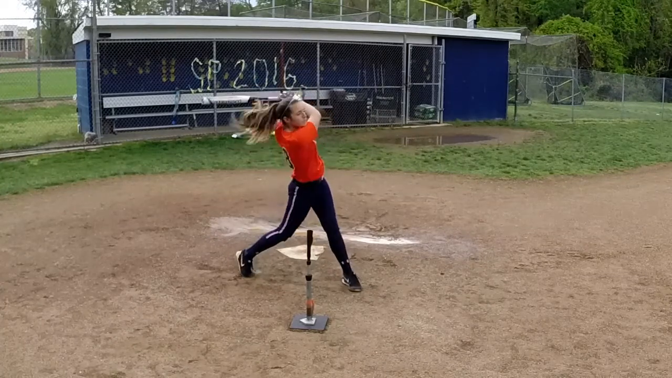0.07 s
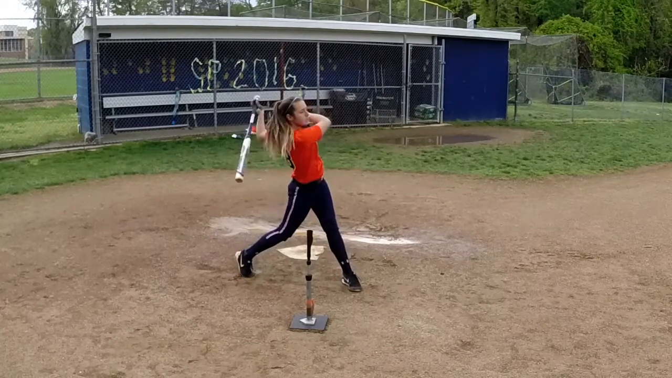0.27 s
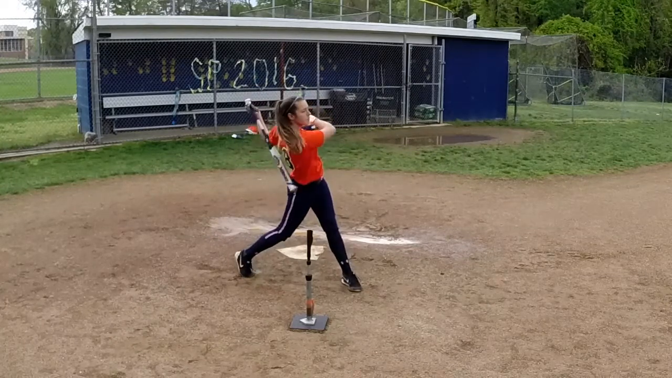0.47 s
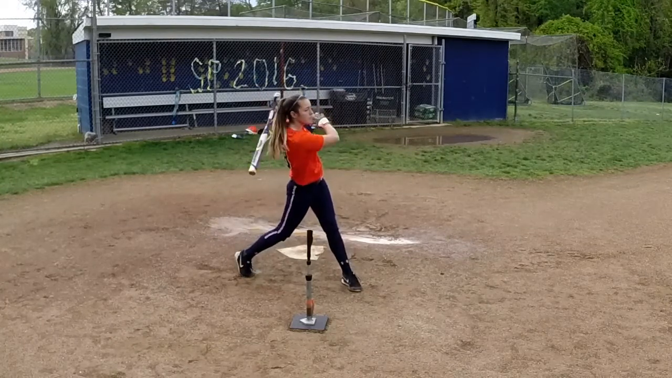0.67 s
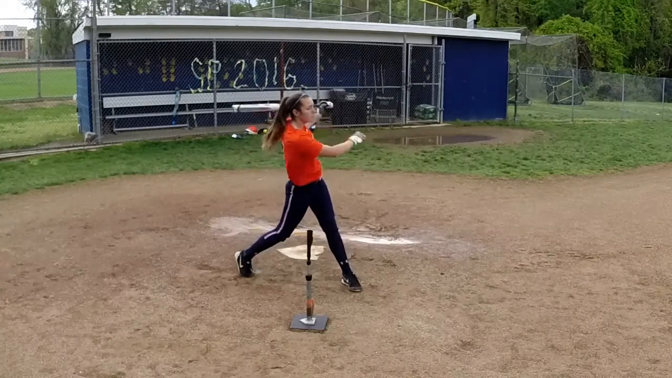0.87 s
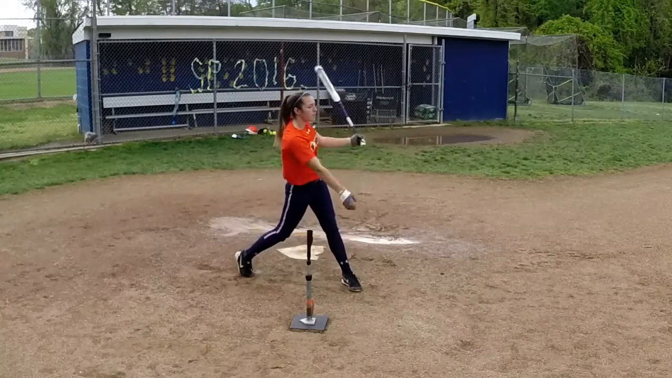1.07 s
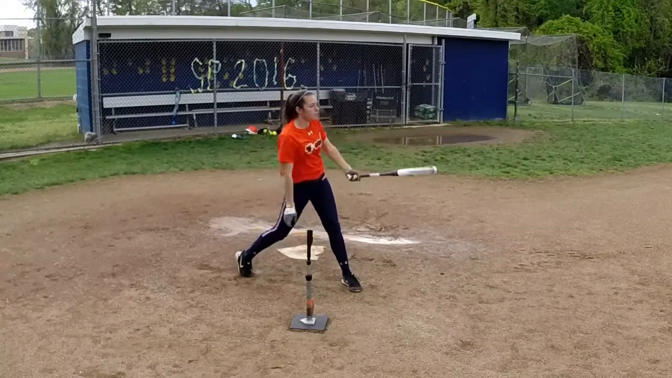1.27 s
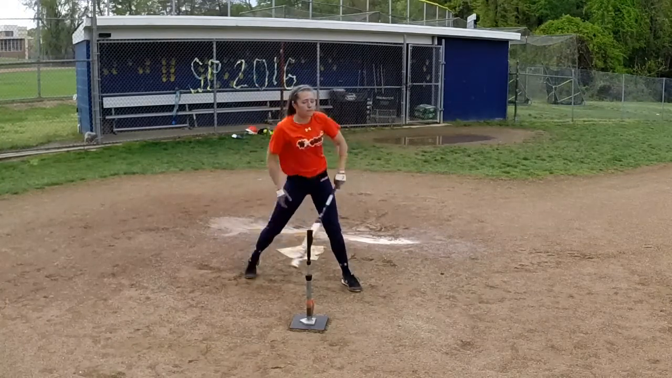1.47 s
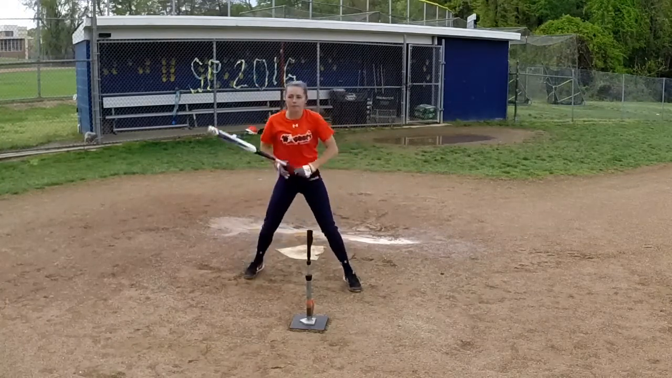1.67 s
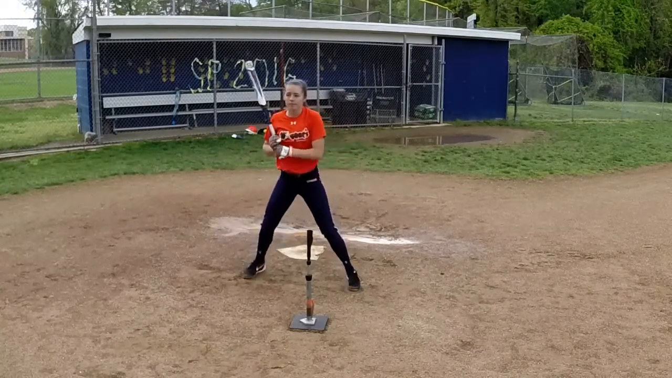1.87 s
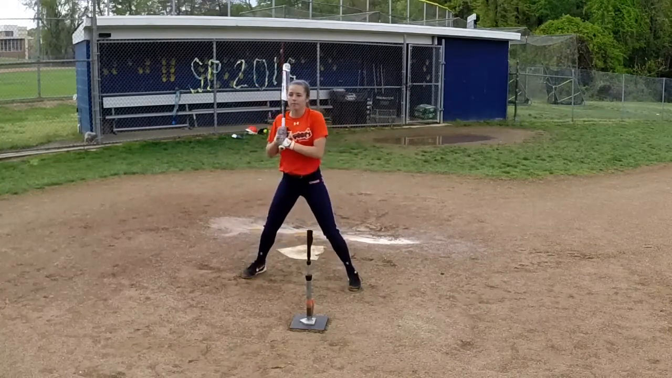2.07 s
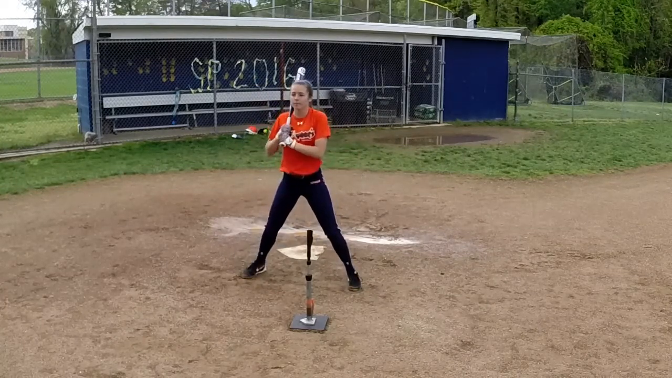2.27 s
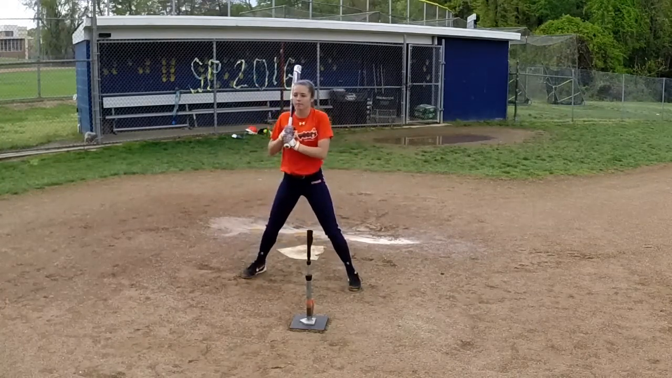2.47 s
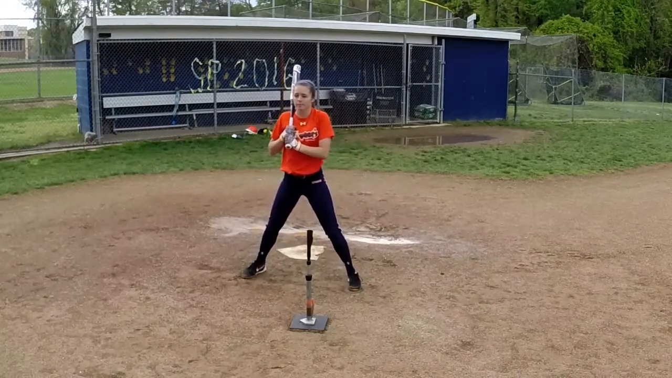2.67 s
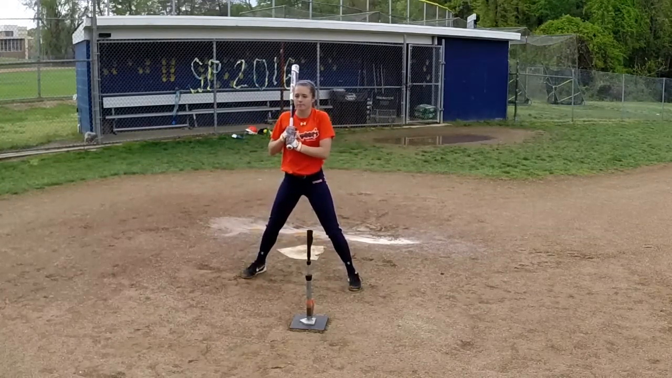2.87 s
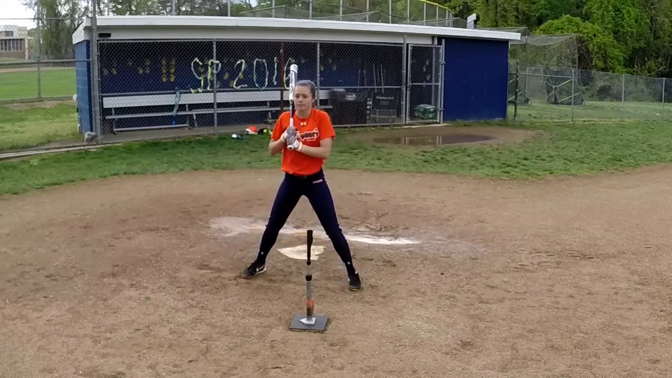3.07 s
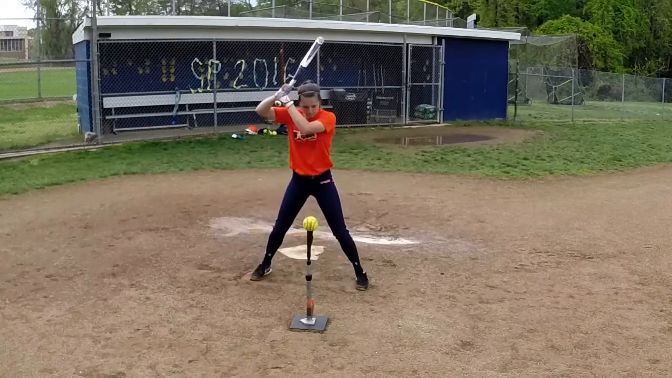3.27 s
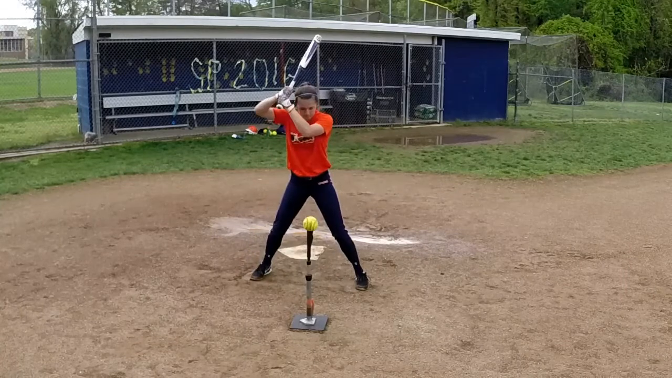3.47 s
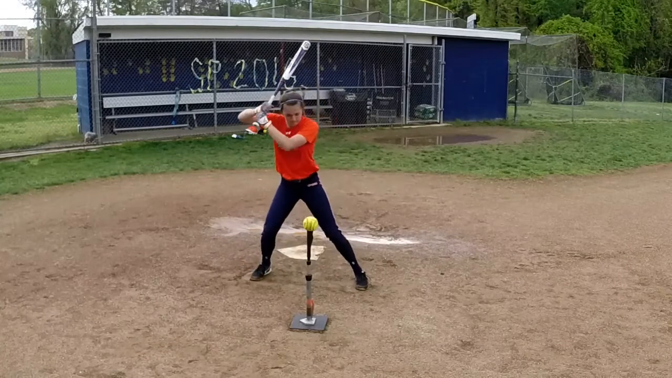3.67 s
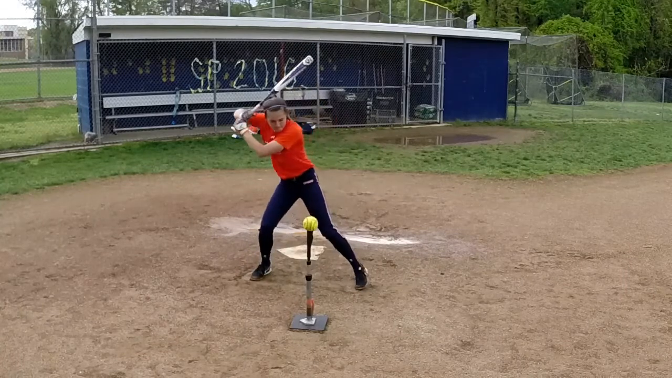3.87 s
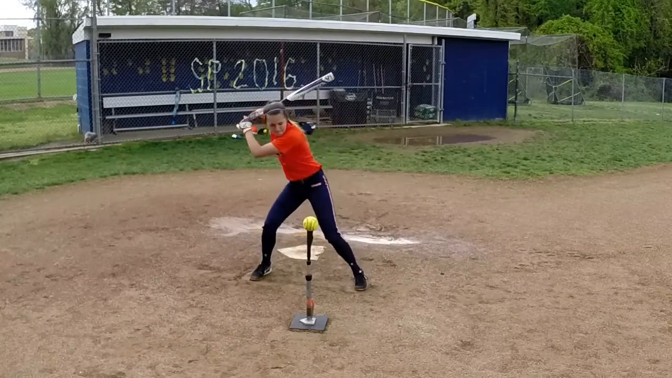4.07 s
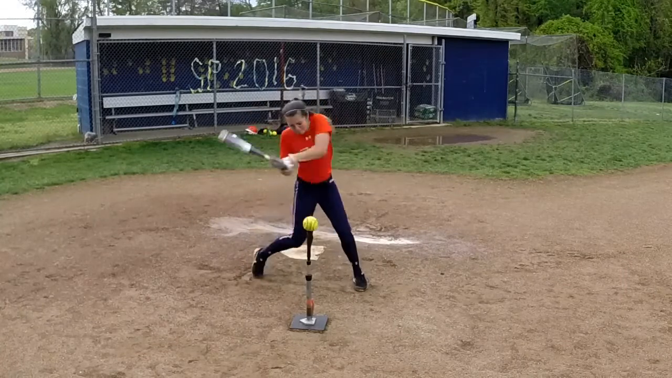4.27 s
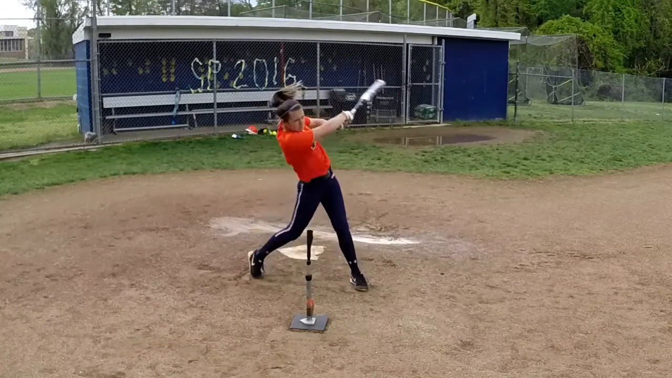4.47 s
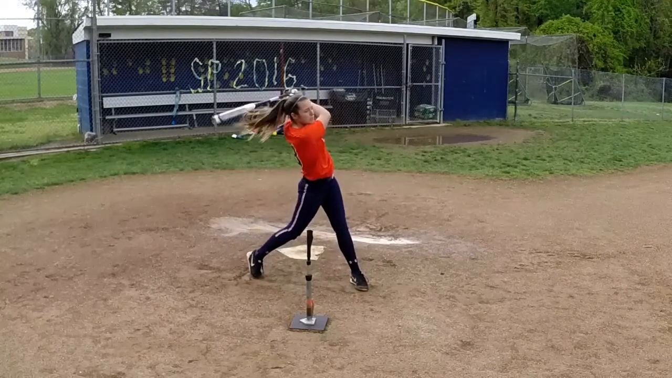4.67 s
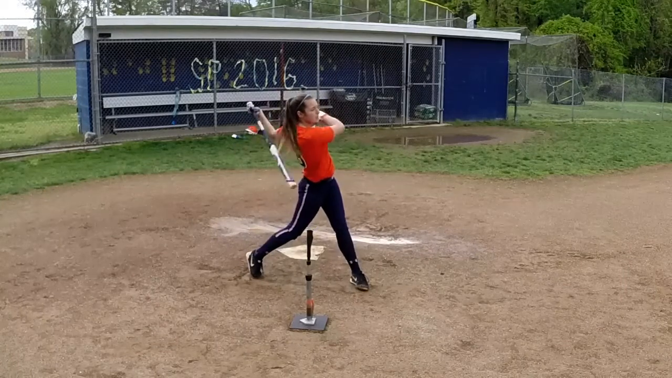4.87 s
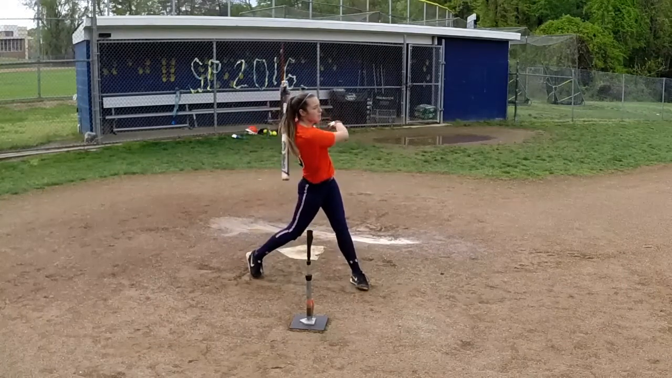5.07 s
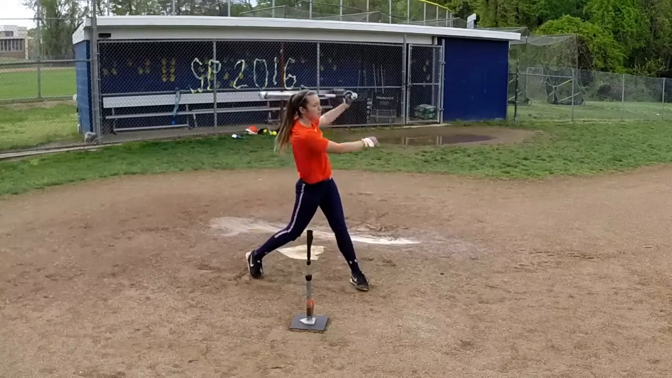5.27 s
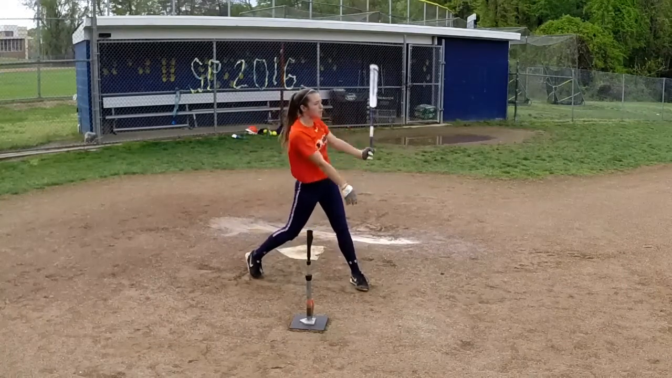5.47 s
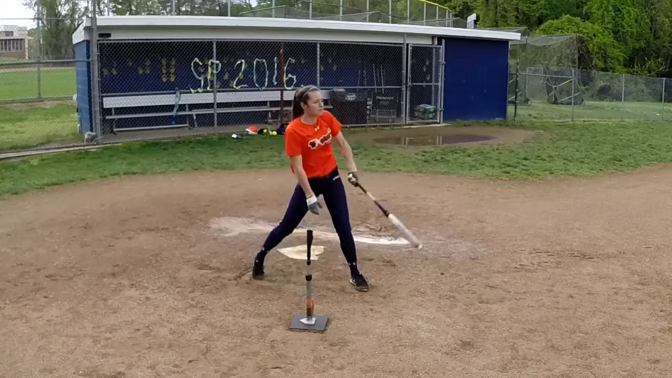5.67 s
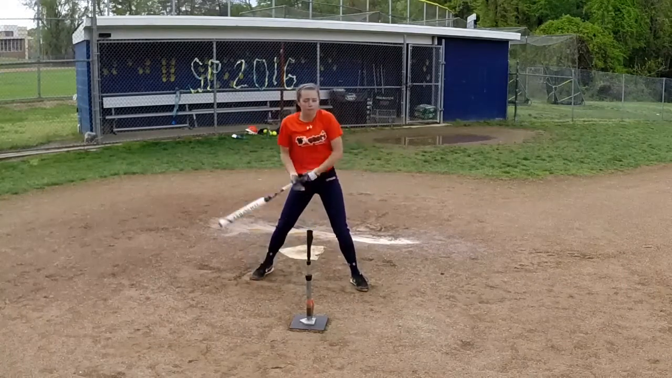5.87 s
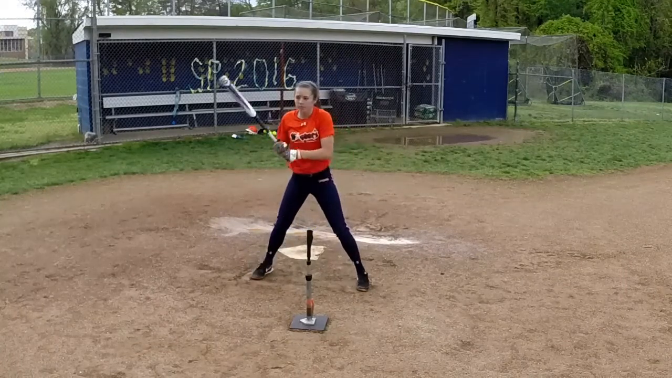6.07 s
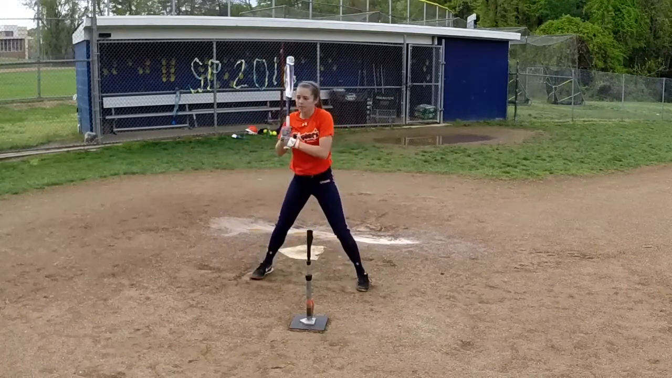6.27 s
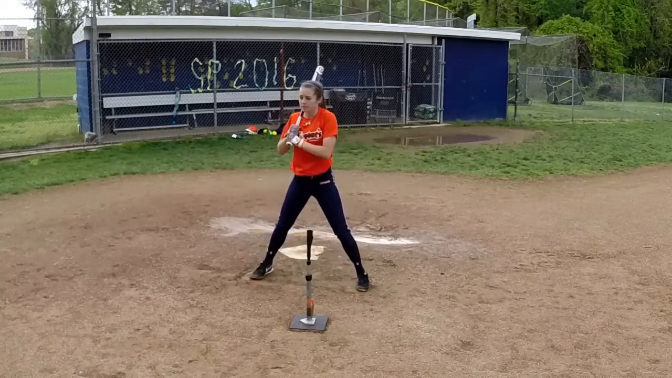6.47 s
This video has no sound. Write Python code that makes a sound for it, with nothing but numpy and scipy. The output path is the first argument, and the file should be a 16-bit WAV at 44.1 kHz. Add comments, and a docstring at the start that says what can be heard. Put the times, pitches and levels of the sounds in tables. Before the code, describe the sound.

On an open ball field, the tail of a bat hit gives way to a ball rattling a chain-link fence and thudding to the ground. Faint birds chirp and whistle through a pause. Then a loud, sharp bat crack echoes briefly off nearby walls, followed by a lighter fence rattle and a few soft bounces. Shoes scuff faintly in the dirt, and distant traffic hums throughout.

```python
"""Softball off a tee

A batter hits on an open field, opening on the tail of an earlier hit. The bat's barrel rings under a
sharp crack, and the dugout and far walls answer. The ball rattles a chain-link fence and thuds to the
ground. Shoes and clothes scuff, birds whistle faintly and far traffic hums."""
import sys
import numpy as np
from scipy import signal
from scipy.fft import rfft, irfft, next_fast_len
from scipy.io import wavfile
from scipy.ndimage import map_coordinates

SR = 44100
rng = np.random.default_rng(int(sys.argv[2]) if len(sys.argv) > 2 else 0)


def wrap_up_sound(samples):
    """Save the sound to the file named by the first command line argument, as 16-bit audio."""
    columns = np.atleast_2d(samples).T
    # keep every value between -1 and 1, then stretch to whole-number steps
    tamed = np.clip(columns, -1, 1)
    steps = np.round(tamed * 32767).astype(np.int16)
    wavfile.write(sys.argv[1], SR, steps)


N = 287530

# Bat meets ball. Each row: start in seconds, level in dB.
BAT_HITS = [(-.074, -4.5), (4.472, 0)]
# The barrel's ringing modes. Each row: pitch in Hz, level in dB, t60 in seconds.
BARREL_MODES = [(696, -0.5, 0.029), (1130, 2, 0.027), (2012, -4.5, 0.016), (3200, -6.5, .018),
                (6155, -7.5, 0.0077)]
# Crackle of ball and shell. Each row: band centre in Hz, level in dB, t60 in seconds.
CRACK_BANDS = [(770, -22.5, 0.047), (1520, -15.5, 0.025), (2480, -3, 0.019), (3207, -6, 0.026),
               (4860, -8, 0.019), (5950, -18, 0.036), (8600, -29.5, 0.034), (12970, -35, 0.021)]
# Colour of the wash scattered back after a hit. Each row: frequency in Hz, level in dB.
WASH_SPECTRUM = [(240, -51), (400, -22), (535, -20.5), (715, -13), (900, -14.5), (1110, -2), (1490, -12),
                 (1960, -15), (2220, -16.5), (4350, -15.5), (5380, -19.5), (6770, -17.5), (15500, -40.5)]
# Returns off far buildings. Each row: delay in seconds, level in dB, rise and t60 in seconds.
FAR_ECHOES = [(.4, -46, 0.052, 1), (.58, -51.5, 0.22, 1)]
SNAP_S, SNAP_DB, SNAP_HZ, SNAP_T60_S = .0462, -7, 2400, .002  # a short, sharp click just after each hit
PREROLL, BARREL_EDGE_HZ = SR // 10, 330  # samples of room for the early hit; the barrel's low cut
def bat():
    """The swing whooshes, the barrel rings briefly under a crackle, and the surroundings answer."""
    direct, around = np.zeros((2, N + PREROLL))
    t, tail_t = np.arange(SR // 10) / SR, np.arange(SR) / SR
    for s, db in BAT_HITS:
        at = s + PREROLL / SR
        ring = sum(amp(level) * burst(t, 0.7 / hz, t60) * np.sin(2 * np.pi * hz * t)
                   for hz, level, t60 in BARREL_MODES)
        crack = sum(amp(level) * burst(t, 0.00096, t60) * band(len(t), hz, 0.11)
                    for hz, level, t60 in CRACK_BANDS)
        add(direct, at, amp(db) * (ring + crack))
        snap = burst(t, SNAP_T60_S / 20, SNAP_T60_S) * -np.sin(2 * np.pi * SNAP_HZ * t)
        add(around, at + SNAP_S, amp(db + SNAP_DB) * snap)
        wash = sum(amp(-60 * tail_t / t60) * band(SR, hz, 1.6)
                   for hz, t60 in [(500, .3), (3000, .45), (13000, .3)])
        wash = filtered(wash, lambda hz: amp(along(WASH_SPECTRUM, hz)))
        fade_in = 1 - np.exp(-tail_t / 0.022)
        add(around, at + 0.0069, amp(db - 28) * fade_in * wash / np.std(wash[:len(t)]))
        sing = burst(tail_t, 0.022, 0.59) * band(SR, 4360, 0.019)  # the barrel's thin wall sings on
        add(around, at + 0.0067, amp(db - 41) * sing)
        for delay, far_db, rise, t60 in FAR_ECHOES:  # only the main barrel tone carries that far
            gain = amp(db + far_db + 5.7 * wobble(29.8)[:SR])
            add(around, at + delay, gain * burst(tail_t, rise, t60) * band(SR, 1180, 0.11))
    whoosh = (t / 0.094) ** 3.5 * band(len(t), 390, .6)  # air torn just before the last hit
    add(around, at - .1, amp(-44) * whoosh)
    barrel = filtered(direct, lambda hz: highpass(hz, BARREL_EDGE_HZ) ** 2)  # too thin to radiate bass
    return (barrel + wall_echoes(direct) + around)[PREROLL:]


# Slaps off the dugout and walls. Each row: delay in seconds, level in dB, smear in seconds.
WALL_SLAPS = [(.023, -25, 0.0048), (.029, -25, 0.0055), (.037, -6, 0.013), (.044, -10, 0.0053),
              (0.059, -24, 0.028), (.12, -33, 0.026)]
def wall_echoes(x):
    """Small, rough walls return smeared, duller copies with little bass."""
    response, t = np.zeros(SR), np.arange(SR // 10) / SR
    for delay, db, spread in WALL_SLAPS:
        smear = rng.standard_normal(len(t)) * burst(t + 1 / SR, spread / 10, spread)
        add(response, delay, amp(db) * smear / np.linalg.norm(smear))
    echoes = signal.fftconvolve(x, response)[:len(x)]
    return filtered(echoes, lambda hz: highpass(hz, 1200) / (1 + 1j * hz / 2200) ** 2)


# The ball jolts the fence. Each row: start in seconds, chatter in dB, rise and t60 in seconds,
# high ring in dB, post or rail knock in dB, knock centre in Hz, fizz in dB.
FENCE_JOLTS = [(.153, -31, 0.0048, 0.17, -36, -58, 900, -49),
               (.171, -19.5, 0.0018, 0.019, -61, -36, 415, -63),
               (0.171, -48, 0.0024, 0.045, -61, -23, 2700, -65),
               (.219, -22, 0.0094, .1, -43, -19.5, 750, -60),
               (.225, -20.5, 0.0079, 0.11, -41, -20.5, 810, -40),
               (.261, -32, 0.03, 0.13, -55, -23, 990, -58), (.299, -34, 0.0022, 0.056, -58, -38, 1000, -67),
               (0.3741, -38, 0.0012, 0.057, -66, -42, 735, -42),
               (4.698, -29.5, 0.0021, 0.14, -45.5, -38.5, 526, -50),
               (4.698, -48, 0.0019, .05, -58, -29.5, 2800, -60),
               (4.746, -43, 0.0016, 0.16, -61, -32, 3430, -60),
               (4.775, -50, 0.0023, 0.3, -75, -57, 900, -71),
               (4.884, -44, 0.0026, 0.043, -76, -57, 1100, -82),
               (5.096, -54, .003, 0.17, -67, -63, 1100, -74), (5.142, -51, .003, 0.04, -71, -55, 1100, -63),
               (5.2, -49.5, 0.0018, 0.056, -67, -70, 1100, -64),
               (5.262, -59, .002, .08, -71, -70, 1100, -74)]
# The panel sways on. Each row: start and length in seconds, then chatter, low ring, high ring, fizz in dB.
PANEL_SWAYS = [(0.156, 1, -33, -56, -64, -54), (4.683, 0.91, -38, -55, -63, -77)]
# Colour of wire chattering on wire. Each row: frequency in Hz, level in dB.
CHATTER_SPECTRUM = [(710, -11), (1200, -6.5), (1710, -22), (2380, -1), (2470, -0.5), (3790, -9),
                    (4560, -11), (5970, -14), (6610, -18), (7660, -16.5), (11000, -25), (14300, -83),
                    (22000, -120)]
# Resonances of the mesh. Each row: pitch in Hz, width in Hz, level in dB.
MESH_MODES = [(2043, 390, -3), (2340, 46, 0), (2472, 21, -12), (2540, 50, -10), (2785, 69, -6),
              (3175, 84, -5.5), (3660, 100, -13), (4180, 140, -20), (4700, 120, -14), (6380, 38, -6),
              (6630, 54, -6), (6770, 340, -7)]
# Single links ring out. Each row: start in seconds, pitch in Hz, level in dB, t60 in seconds.
LINK_TINKLES = [(.27, 2345, -42, .5), (.377, 2455, -47, .5), (.376, 14100, -62, .2),
                (.377, 13500, -65, .18), (.405, 9800, -63, .08), (5.055, 4350, -58, .04),
                (5.1, 9000, -68, .08), (5.203, 4350, -56, .05), (5.205, 7600, -65, .14),
                (5.25, 3650, -59, .18), (5.265, 10000, -65, .05)]
LOW_RING_DB, LOW_RING_T60_S, HIGH_RING_T60_S = -16.5, 0.21, 0.43  # low ring follows the jolt's level
SWAY_RISE_S, SETTLE_S = 0.06, 0.36
SWAY_CHATTER_T60_S, SWAY_LOW_T60_S, SWAY_HIGH_T60_S = 0.74, 5.1, 2.35
def fence():
    """Links chatter and fizz at each jolt, the post knocks, the mesh jingles while the panel sways."""
    shake, fizz, low_ring, high_ring = np.zeros((4, N))  # envelopes
    knocks, jingle = np.zeros((2, N))
    t = np.arange(SR) / SR
    for s, db, rise, t60, high_db, knock_db, knock_hz, fizz_db in FENCE_JOLTS:
        add(shake, s, amp(db) * burst(t, rise, t60))
        add(fizz, s, amp(fizz_db) * burst(t, rise, t60))
        add(low_ring, s, amp(db + LOW_RING_DB) * burst(t, rise, LOW_RING_T60_S))
        add(high_ring, s, amp(high_db) * burst(t, rise, HIGH_RING_T60_S))
        add(knocks, s, amp(knock_db) * burst(t, rise, .12) * band(SR, knock_hz, 0.4))
    for s, length, db, low_db, high_db, fizz_db in PANEL_SWAYS:
        settle = np.clip((length - t) / SETTLE_S, 0, 1)
        add(shake, s, amp(db) * settle * burst(t, SWAY_RISE_S, SWAY_CHATTER_T60_S))
        add(fizz, s, amp(fizz_db) * settle * burst(t, SWAY_RISE_S, SWAY_CHATTER_T60_S))
        add(low_ring, s, amp(low_db) * settle * burst(t, SWAY_RISE_S, SWAY_LOW_T60_S))
        add(high_ring, s, amp(high_db) * settle * burst(t, SWAY_RISE_S, SWAY_HIGH_T60_S))
    chatter = shake * amp(0.81 * wobble(120)) * noise(CHATTER_SPECTRUM, spiky_db=1.5)
    chatter += fizz * band(N, 9100, 0.95)
    for hz, width, db in MESH_MODES:  # every resonance is struck at its own chance moments
        clinks = amp(2.5 * wobble(40)) * rng.standard_normal(N)
        ring = unit(signal.lfilter(*signal.iirpeak(hz, hz / width, SR), clinks))
        jingle += amp(db) * (low_ring if hz < 5000 else high_ring) * ring
    for s, hz, db, t60 in LINK_TINKLES:
        add(jingle, s, amp(db) * burst(t, 0.00071, t60) * band(SR, hz, 0.0062))
    return chatter + jingle + knocks


# The ball lands. Each row: start in seconds, thud in dB, pitch in Hz that its modes scale from, grit in dB,
# grit centre in Hz, grit width as a share of its centre.
LANDINGS = [(.870, -20.5, 298, -39.5, 6400, 0.44), (0.916, -31.5, 288, -51, 6000, 0.49),
            (0.943, -36, 242, -48, 5950, 0.34), (1.291, -44, 248, -54, 7900, 0.27),
            (2.568, -70, 250, -61, 12000, .3), (5.5173, -31, 241, -37, 3730, 0.98),
            (5.56, -36, 195, -40, 3400, 0.42), (5.841, -46, 200, -44.5, 3510, 0.97),
            (5.945, -51, 200, -47.5, 2830, 0.14)]
def ground_thuds():
    """Each landing is a soft thud of two hollow modes, with a spit of grit."""
    out, t = np.zeros(N), np.arange(SR // 10) / SR
    for s, db, hz, grit_db, grit_hz, width in LANDINGS:
        low_mode = burst(t, 0.0017, 0.053) * np.sin(2 * np.pi * 0.82 * hz * t)
        high_mode = amp(5) * burst(t, 0.0012, 0.016) * np.sin(2 * np.pi * 1.455 * hz * t)
        grit = burst(t, 0.00038, 0.0093) * band(len(t), grit_hz, width)
        add(out, s, amp(grit_db) * grit - amp(db) * (low_mode + high_mode))
    return out + amp(-11.5) * field_reverb(out, delay=0.023)


# Grainy strokes. Each row: start in seconds, length in seconds, dirt in dB, cloth in dB. Most are shoe and
# cloth moves; the stroke from 5.09 s is the fence's links grating as the panel sways.
SCUFF_STROKES = [(1.45, 0.16, -72, -78), (1.586, 0.15, -67, -80), (1.827, 0.12, -65.5, -75),
                 (1.91, 0.23, -68.5, -79), (2.906, .2, -70.5, -87), (3.04, .05, -76, -75),
                 (3.15, 0.14, -75, -73.5), (4.143, 0.32, -65.5, -75), (4.325, 0.163, -57.5, -70),
                 (5.093, .28, -75.5, -78), (5.536, 0.081, -73, -73), (5.71, 0.16, -70, -79),
                 (5.826, 0.017, -73, -73), (5.835, 0.16, -69, -80), (6.382, 0.24, -66, -77)]
# Colour of scraped dirt. Each row: frequency in Hz, level in dB.
DIRT_SPECTRUM = [(2500, -29), (4500, -5.5), (6000, 0), (7500, -7.5), (10000, -30)]
# The thin, bright hiss of cloth. Each row: frequency in Hz, level in dB.
CLOTH_SPECTRUM = [(6000, -29), (8500, 10), (12000, -7.5), (15500, -2)]
STROKE_SHARPNESS, STROKE_LEAN = 1.9, 0.63  # a lean under 1 peaks early
def scuffs():
    """Shoes turn in the dirt and clothes rub, and the fence grates once: strokes of grainy treble that swell
    and fade."""
    dirt, cloth = np.zeros((2, N))
    for s, length, dirt_db, cloth_db in SCUFF_STROKES:
        progress = np.linspace(0, 1, round(length * SR))
        stroke = np.abs(np.sin(np.pi * progress ** STROKE_LEAN)) ** STROKE_SHARPNESS
        add(dirt, s, amp(dirt_db) * stroke)
        add(cloth, s, amp(cloth_db) * stroke)
    scrape = dirt * amp(1.4 * wobble(60)) * noise(DIRT_SPECTRUM, spiky_db=2.5)
    rustle = cloth * amp(2.9 * wobble(60)) * noise(CLOTH_SPECTRUM, spiky_db=2.5)
    return scrape + rustle


# A slurred bird phrase. Each row: start and length in seconds, upward slur in Hz, level in dB.
BIRD_WHISTLES = [(3.34, .2, 253.3, -60), (3.555, 0.2, 232, -58), (3.77, .17, 260, -54.5),
                 (3.949, 0.092, 29.9, -57), (4.065, .11, 30, -61), (4.2, .13, 30, -68.5)]
# Short bird notes. Each row: start and length in seconds, first and last pitch in Hz, level in dB.
BIRD_CHIRPS = [(1.127, 0.039, 2315, 2440, -57), (1.693, 0.04, 2310, 2480, -60),
               (1.767, 0.039, 2580, 2620, -57), (2.91, 0.083, 3400, 4600, -75),
               (3.03, 0.13, 4350, 3680, -67), (3.0, 0.07, 5350, 5350, -68), (4.264, 0.11, 5240, 5350, -64),
               (4.27, 0.074, 4300, 4400, -72), (6.311, 0.16, 3150, 2500, -64),
               (6.464, .05, 2350, 2100, -62)]
WHISTLE_HZ, SLUR_S, SWELL_DB = 2890, .026, 5  # each whistle slides up to one pitch and swells
FLUTTER_DB, QUAVER_HZ = 2.8, 15
def birds():
    """Thin whistles and chirps, unsteady in pitch and level, blurred by distance."""
    out, quaver = np.zeros(N), QUAVER_HZ * wobble(80)
    for s, length, slur_hz, db in BIRD_WHISTLES:
        t = np.arange(round(length * SR)) / SR
        hz = WHISTLE_HZ - slur_hz * np.exp(-t / SLUR_S) + quaver[round(s * SR):][:len(t)]
        swell = np.sqrt(np.abs(np.sin(np.pi * t / length))) * amp(SWELL_DB * (t / length - 1.5))
        add(out, s, amp(db) * swell * np.sin(2 * np.pi * np.cumsum(hz) / SR))
    for s, length, first_hz, last_hz, db in BIRD_CHIRPS:
        progress = np.linspace(0, 1, round(length * SR))
        cycles = length * (first_hz * progress + (last_hz - first_hz) * progress ** 2 / 2)
        cycles += np.cumsum(quaver[round(s * SR):][:len(progress)]) / SR
        arch = np.sqrt(np.abs(np.sin(np.pi * progress)))
        add(out, s, amp(db) * arch * np.sin(2 * np.pi * cycles))
    out *= amp(FLUTTER_DB * wobble(60))
    return out + amp(-8) * field_reverb(out, delay=.02)


# Decay of the open field. Each row: frequency in Hz, t60 in seconds.
FIELD_DECAY = [(300, 0.43), (1200, 0.96), (4000, 1), (12000, 0.75)]
def field_reverb(x, delay):
    """The surroundings scatter sound back, each frequency dying at its own speed."""
    hz, t, spectra = signal.stft(rng.standard_normal(SR), SR, nperseg=256)
    decay = amp(-60 * t / along(FIELD_DECAY, hz)[:, None])
    tail = signal.istft(spectra * decay, SR, nperseg=256)[1]
    delayed = np.pad(x, (round(delay * SR), 0))
    return signal.fftconvolve(delayed, tail / np.linalg.norm(tail))[:len(x)]


# Wavering engine tones. Each row: pitch in Hz, half-width in Hz, level in dB.
ENGINE_HUMS = [(72.9, 4.6, -57), (96.4, 2.8, -60.5), (186.9, 2.2, -63.5)]
# The rumble's level ride. Each row: time in seconds, level in dB.
RUMBLE_RIDE = [(0.0, -57), (0.71, -52), (1.94, -52.5), (3.14, -50), (3.58, -53), (3.92, -51), (4.49, -53),
               (4.76, -63), (4.92, -52), (5.85, -52.5), (6.14, -51.5), (6.52, -49.5)]
# Colour of the rumble. Each row: frequency in Hz, level in dB.
RUMBLE_SPECTRUM = [(12, -30), (20, 3.5), (65, -2.5), (103, 6), (154, -1), (189, -3.5), (219, -9.5),
                   (264, -12), (400, -19), (520, -67), (880, -120)]
# Colour of far tyres and leaves. Each row: frequency in Hz, level in dB.
HISS_SPECTRUM = [(120, -53), (200, -1), (219, -13), (283, -8), (333, -15), (371, -12), (554, -14),
                 (607, -13), (1070, -12.5), (1560, -21.5), (3810, -27), (13900, -48), (15500, -71)]
HISS_DB = -55
def far_traffic():
    """The background bed: engines hum and rumble under a smooth hiss of tyres and leaves."""
    hum = np.zeros(N)
    for hz, width, db in ENGINE_HUMS:
        tone = filtered(rng.standard_normal(N), lambda f: 1 / (1 + ((f - hz) / width) ** 2))
        hum += amp(db) * unit(tone)
    rumble = amp(curve(RUMBLE_RIDE)) * noise(RUMBLE_SPECTRUM)
    hiss = amp(HISS_DB + 0.14 * wobble(1.4) + 0.14 * wobble(12)) * noise(HISS_SPECTRUM)
    return rumble + hum + hiss


def amp(db):
    """Gain of a level in dB."""
    return 10 ** (np.asarray(db) / 20)


def unit(x):
    """x at rms 1."""
    return x / np.sqrt(np.mean(x ** 2) + 1e-20)


def along(points, hz):
    """Read (Hz, value) points at hz, on a log frequency axis."""
    freqs, values = np.transpose(points)
    return np.interp(np.log(hz + 1), np.log(freqs + 1), values)


def curve(points):
    """One value per sample from (seconds, value) points."""
    return np.interp(np.arange(N) / SR, *np.transpose(points))


def wobble(rate):
    """A smooth random curve, rate knots a second."""
    knots = rng.standard_normal(int(N * rate / SR) + 4)
    coarse = np.arange(0, N + 32, 32)
    return np.interp(np.arange(N), coarse, map_coordinates(knots, [coarse * rate / SR]))


def filtered(x, response):
    """x through a complex frequency response."""
    size = next_fast_len(len(x) + SR // 4)
    return irfft(rfft(x, size) * response(np.fft.rfftfreq(size, 1 / SR)), size)[:len(x)]


def noise(spectrum, spiky_db=0):
    """Coloured noise of rms 1; spiky noise is made of tiny clicks of uneven size."""
    raw = rng.standard_normal(N) * amp(spiky_db * rng.exponential(size=N))
    return unit(filtered(raw, lambda hz: amp(along(spectrum, hz))))


def band(count, hz, width):
    """Noise of rms 1 in a band whose width is a share of its centre."""
    white = rng.standard_normal(count)
    return unit(filtered(white, lambda f: np.exp(-(np.log((f + 1) / hz) / width) ** 2)))


def highpass(hz, edge_hz):
    """Second-order high-pass response."""
    u = 1j * hz / edge_hz
    return u * u / (1 + np.sqrt(2) * u + u * u)


def add(track, s, sound):
    """Mix a sound in at s seconds."""
    start = round(s * SR)
    track[start:start + len(sound)] += sound[:len(track) - start]


def burst(t, rise, t60):
    """Envelope that rises, then falls 60 dB every t60 seconds."""
    return (1 - np.exp(-t / rise)) * amp(-60 * t / t60)


def scene():
    """All sources at one microphone."""
    return (bat() + fence() + ground_thuds() + birds() + scuffs() + far_traffic())[None]


TOP_HZ = 15300
def record(dry):
    """The input clips softly at full scale and cuts off steeply at its band limit."""
    clipped = dry[0] / (1 + np.abs(dry[0]) ** 6) ** (1 / 6)
    return filtered(clipped, lambda hz: 1 / (1 + (hz / TOP_HZ) ** 120))[None]


dry = scene()
out = record(dry)
wrap_up_sound(out)
```